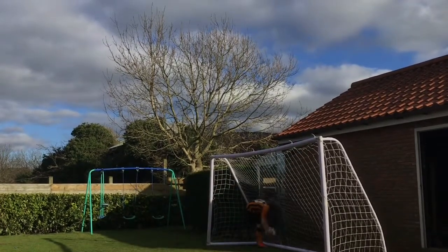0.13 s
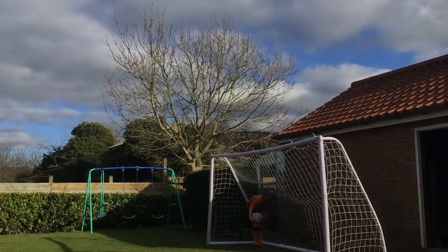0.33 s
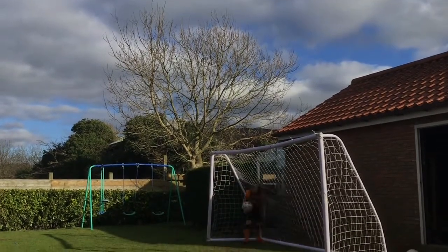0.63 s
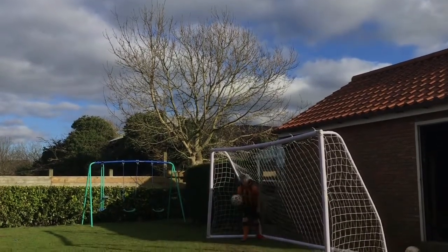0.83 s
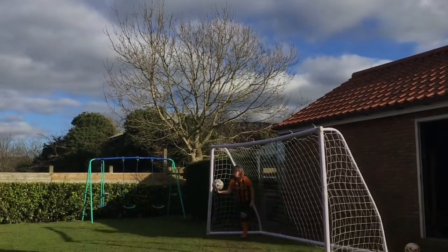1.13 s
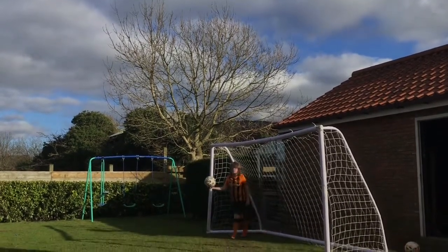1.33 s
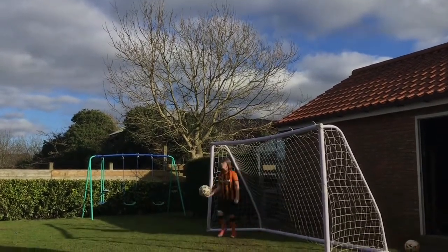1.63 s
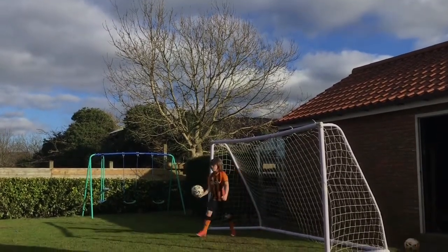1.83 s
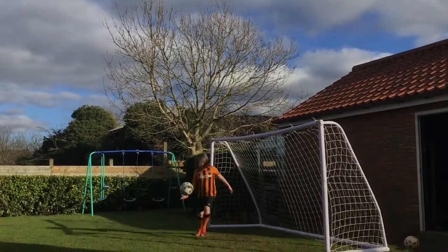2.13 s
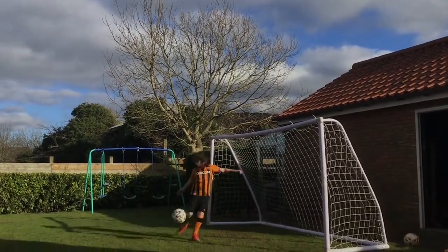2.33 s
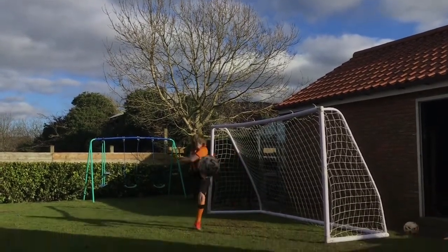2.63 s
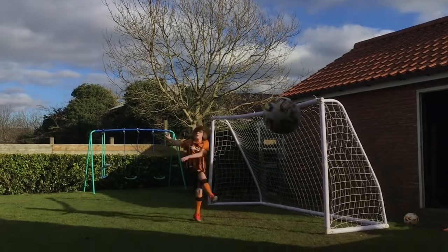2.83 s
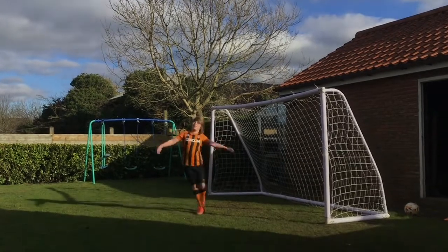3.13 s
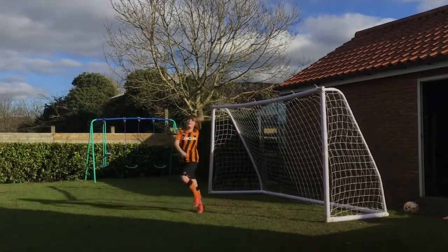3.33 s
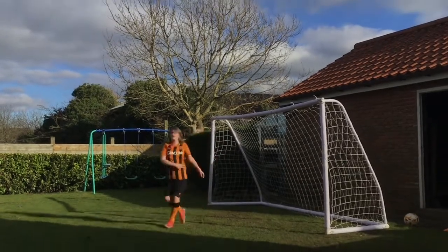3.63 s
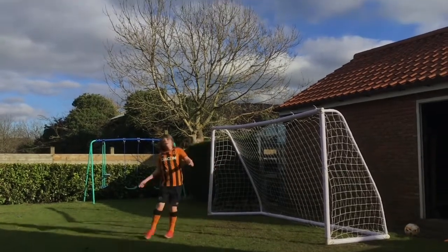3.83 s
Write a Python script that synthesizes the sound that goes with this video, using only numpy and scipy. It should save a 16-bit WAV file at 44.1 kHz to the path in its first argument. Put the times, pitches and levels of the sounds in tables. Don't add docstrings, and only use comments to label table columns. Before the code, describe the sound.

A football is punted with a dull thud, then slams loudly into a nearby panel and bounces

```python
import sys
import numpy as np
from scipy import signal
from scipy.io import wavfile

SR = 44100
rng = np.random.default_rng(int(sys.argv[2]) if len(sys.argv) > 2 else 0)


def materialize(psi):
    bounded = np.clip(np.atleast_2d(psi).T, -1, 1)
    quanta = np.round(bounded * 32767).astype(np.int16)
    wavfile.write(sys.argv[1], SR, quanta)


def volts(x):
    e = np.asarray(x, float) / 20
    return 10 ** e


N = 176400
TIME_S = np.arange(N) / SR
BAND_EDGES_HZ = 25 * 2 ** np.arange(0, 9.4, 1 / 3)
BAND_HZ = np.sqrt(BAND_EDGES_HZ[1:] * BAND_EDGES_HZ[:-1])

# start_s, pitch_hz, level_db, hold_s, t60_s
PUNT_MODES = [
    (2.4035, 125.5, -17.5, 0.017, 0.098),
    (2.4, 177, -22.5, 0.008, 0.093),
    (2.402, 67, -34, 0.025, 0.18),
    (2.399, 302, -34, 0.0059, 0.038),
]
# start_s, pitch_hz, level_db, hold_s, t60_s
THUDS = [(3.1398, 135, -5, 0.017, 0.02), (3.1416, 258, -10, 0.013, 0.02), (3.146, 108, -14, 0.03, 0.05),
         (3.1425, 175, -16, .012, .04), (3.142, 346, -20, .008, 0.03), (3.15, 56, -24, 0.024, 0.11),
         (3.2, 139, -24, 0.0052, 0.16), (3.283, 355, -36, 0.013, 0.04), (3.29, 95, -35, 0.048, 0.12),
         (3.357, 190, -16.5, 0.0117, 0.049), (3.358, 297, -18, 0.0085, 0.016),
         (3.3705, 85, -10, 0.0073, .03), (3.3635, 125, -15, 0.008, .03), (3.3885, 79, -13, 0.024, 0.12),
         (3.446, 138, -27.5, 0.021, 0.095), (3.449, 83.8, -28.5, 0.024, 0.21),
         (3.886, 115.2, -33, 0.067, 0.59), (3.888, 188, -38, 0.015, 0.13)]
# start_s, level_db, hold_s, t60_s,
# tilt_db_per_octave
SLAPS = [(2.4, -37, 0.0082, 0.11, 0.45), (2.413, -52, 0.0032, 0.058, 5.5), (2.422, -55, .004, .08, 3),
         (2.447, -63, .005, 0.097, 4.5), (2.497, -72.5, 0.0073, 0.54, -4),
         (3.128, -50.5, 0.0074, 0.036, 2.5), (3.1394, -27, 0.017, 0.069, 1.35),
         (3.162, -48.5, 0.013, 0.074, -5), (3.197, -49.5, 0.038, 0.069, 0), (3.283, -61, 0.016, 0.11, 3),
         (3.3533, -34.5, 0.0065, 0.032, -1), (3.363, -38, 0.012, 0.093, 4.5),
         (3.443, -49, 0.0054, 0.078, 1), (3.446, -49.5, 0.0063, 0.073, 4), (3.454, -49.5, 0.01, 0.076, 4.5),
         (3.8857, -46.5, 0.016, 0.1, 4), (3.91, -38, 0.0051, 0.074, 4.5), (3.935, -43, 0.012, 0.13, 1.5),
         (3.996, -58, .01, .1, 5)]
# freq_hz, density_db_per_hz
SLAP_SPECTRUM = [(180, -2), (300, -4.5), (978, -21), (1210, -17), (1870, -22.5), (2700, -24.5),
                 (7570, -36.5), (9000, -38.5), (14700, -43.5), (16000, -42)]
# start_s, peak_db, lowest_hz
CRACKS = [(2.3988, -10.5, 1500), (2.4148, -25, 7000), (2.4222, -17, 5000), (2.448, -36, 5000),
          (3.098, -50, 2500), (3.1404, -5.5, 3000), (3.1468, -5, 1500), (3.149, -9, 4000),
          (3.1535, -5, 1500), (3.161, -18, 2000), (3.33, -40, 5000), (3.354, -22, 3000),
          (3.3605, -21, 3000), (3.366, -13, 2500), (3.451, -32, 3500), (3.456, -29, 5000),
          (3.8854, -30, 1200), (3.9068, -8, 7500), (3.9125, -15, 8000), (3.9352, -16, 7500),
          (3.941, -22, 8000), (3.9955, -25, 7000)]
# start_s, level_db, hold_s, t60_s, centre_hz
RINGS = [(2.3985, -35.5, 0.004, 0.034, 820), (3.142, -33, .014, .09, 5400), (3.17, -50, .05, .12, 4800),
         (3.49, -62, .045, .1, 4000), (3.385, -52, .03, .1, 2600), (2.446, -54, .01, .08, 1150),
         (2.495, -59, .005, 0.34, 1295), (3.144, -26, 0.012, 0.033, 2576),
         (3.1405, -26, 0.0062, 0.055, 786), (3.157, -41, 0.0085, .1, 1225),
         (3.208, -55.5, 0.03, 0.14, 2590), (3.356, -46.5, 0.0059, 0.25, 1280),
         (3.445, -50.5, 0.0077, 0.1, 1263), (3.446, -51, 0.0065, 0.056, 4500)]
# start_s, peak_db
BLOWS = [
    (3.141, -30),
    (3.147, -27),
    (3.1535, -28),
    (3.163, -34),
    (3.358, -42),
    (3.366, -40),
    (3.449, -48),
]
# pitch_hz, level_db, t60_s
PANEL_MODES = [(456, -3, .07), (620.5, -10, .05), (727, -5, .05), (1233, -3, .07), (2060, -12, .04),
               (2280, -10, .04), (2460, -10, .04), (2690, -8, .03), (3190, -10, .03), (5690, -20, .03),
               (6190, -20, .03)]
# start_s, peak_db
TAPS = [
    (3.885, -51.5),
    (3.907, -33),
    (3.917, -40),
    (3.935, -35.5),
    (3.946, -48),
]
# pitch_hz, level_db, t60_s
FRAME_MODES = [(1770, -4, .03), (3110, -2, 0.015), (4330, -5, 0.016), (2000, -16.5, 0.13)]
# start_s, level_db, hold_s, t60_s, tilt_db_per_octave
STEPS = [(0.0, -75, 0.042, 0.42, 8.5), (0.659, -72.5, 0.039, 0.21, 0.5), (0.79, -57.5, 0.052, 0.19, 2.5),
         (0.863, -71.5, .06, 0.75, 1), (1.201, -65, .06, 0.22, 5), (1.305, -76, 0.069, 0.39, 2),
         (1.393, -71.5, 0.034, 0.22, 2), (1.6, -80, .1, 0.08, -5.5), (1.71, -67.5, 0.051, 0.21, 0.5),
         (2.265, -69.5, 0.04, 0.088, 3.1), (2.96, -60, 0.02, 0.34, 2), (3.069, -66, 0.063, 0.6, -0.5)]
# freq_hz, density_db_per_hz
STEP_SPECTRUM = [(280, -4.5), (600, -4.5), (1340, -12.5), (2400, -20), (7000, -30.5), (8500, -25.5),
                 (16000, -29)]
# start_s, level_db, hold_s, t60_s, centre_hz
THUMPS = [(0.018, -63.5, 0.047, 0.22, 388.9), (0.78, -65, 0.078, 0.19, 580),
          (1.206, -63.5, 0.012, 0.083, 780), (1.221, -55.5, 0.014, 0.21, 550),
          (1.685, -67.5, 0.044, 0.1, 550), (2.4, -43, 0.0057, 0.17, 426), (2.968, -68, 0.02, 0.15, 4000),
          (3.0, -72, .07, .2, 1900), (.675, -76, .01, .06, 1600), (.719, -74, .01, .05, 1300),
          (1.402, -74, .008, .06, 2500), (1.21, -57, .05, 0.36, 370), (0.786, -66, 0.0091, 0.092, 1100),
          (3.92, -47, 0.046, .15, 600), (2.42, -44.5, 0.018, 0.36, 200), (3.742, -69, .07, 0.2, 1350),
          (3.8, -70, 0.062, .2, 750), (3.357, -33, 0.011, 0.14, 457), (3.895, -46, 0.09, 0.15, 240),
          (3.142, -25, 0.013, 0.15, 325), (3.57, -50, 0.17, 0.43, 107.6)]
# start_s, length_s, first_hz, last_hz, level_db
BIRDS = [
    (2.27, .1, 8150, 7300, -85),
    (2.5, .062, 7800, 7100, -84),
    (2.66, .07, 7450, 6500, -88),
    (2.76, .07, 4300, 4250, -91),
    (1.065, .115, 3400, 3220, -84),
    (1.07, .14, 1650, 1760, -85),
    (.47, .11, 3550, 3400, -90),
    (.89, .08, 3350, 3350, -89),
    (1.84, .14, 3550, 3450, -90),
    (3.04, .035, 4250, 4250, -82),
]
# freq_hz, level_db
RUMBLE_SPECTRUM = [(15, -61.5), (25, -24.5), (59, -16.5), (85, -7.5), (113, -0.5), (186, -15), (214, -17),
                   (349, -21.5), (700, -44), (910, -41.5), (1540, -120)]
# freq_hz, level_db
HISS_SPECTRUM = [(400, -10.5), (600, 2), (1300, -2.5), (3700, -4), (7000, -11.5), (9000, -9), (14000, -14),
                 (16500, -11.5)]


def rms_one(x):
    return x / np.sqrt(np.mean(x ** 2) + 1e-20)


def drift(rate_hz):
    pole = np.exp(-80 * np.pi * rate_hz / SR)
    white = rng.standard_normal(N // 40 + 2002)
    slow = signal.lfilter([1], [1, -2 * pole, pole * pole], white)[2000:]
    return np.interp(np.arange(N) / 40, np.arange(len(slow)), rms_one(slow))


def shape(t, rise_s, hold_s, t60_s):
    return (1 - np.exp(-t / rise_s)) * volts(-60 * np.maximum(t - hold_s, 0) / t60_s)


def thuds(rows, wobble_db, wobble_rad):
    out = np.zeros(N)
    for start_s, pitch_hz, level_db, hold_s, t60_s in rows:
        t = np.maximum(TIME_S - start_s, 0)
        late = np.clip(t / 0.059, 0, 1)
        level = volts(level_db + wobble_db * late * drift(4))
        phase = 2 * np.pi * pitch_hz * t + wobble_rad * late * drift(30)
        out += level * shape(t, 0.0011, hold_s, t60_s) * np.sin(phase)
    return out


def punt():
    first_echo_s, flutter_s, uneven_s = 0.051, 0.044, 0.003
    first_db, loss_db, uneven_db = -10, 3.5, 2.5
    main = thuds(PUNT_MODES[:1], 0, 0)
    out = thuds(PUNT_MODES, 0, 0)
    for k, (later, louder) in enumerate(rng.uniform(-1, 1, (7, 2))):
        delay_s = first_echo_s + k * flutter_s + uneven_s * later
        echo_db = first_db - k * loss_db + uneven_db * louder
        out += volts(echo_db) * np.interp(TIME_S - delay_s, TIME_S, main)
    return out


def bursts(noise, rows, spectrum, rise_s, tail_db, tail_t60_s):
    out = np.zeros(N)
    octave = np.log2(BAND_HZ / 2000)[:, None]
    shrink = 2 ** (-0.13 * octave)
    colour = volts(at_hz(spectrum, BAND_HZ))[:, None]
    scale = np.std(np.sum(colour * noise, axis=0))
    for start_s, level_db, hold_s, t60_s, tilt_db in rows:
        i = int(start_s * SR)
        t = TIME_S[:min(N - i, SR // 2)]
        direct = shape(t, rise_s, hold_s, t60_s * shrink)
        tail = volts(tail_db - 0.96 * octave) * shape(t, 0.0033, hold_s, tail_t60_s * shrink)
        tilted = colour * volts(tilt_db * octave) * noise[:, i:i + len(t)]
        out[i:i + len(t)] += volts(level_db) / scale * np.sum(tilted * (direct + tail), axis=0)
    return out


def cracks():
    out, white = np.zeros(N), rng.standard_normal(N)
    for start_s, peak_db, lowest_hz in CRACKS:
        i = int(start_s * SR)
        t = TIME_S[:min(N - i, SR // 20)]
        snap = volts(peak_db - 10) * shape(t, 0.00033, 0, 0.0049) * white[i:i + len(t)]
        highpass = signal.butter(2, lowest_hz, "high", fs=SR, output="sos")
        out[i:i + len(t)] += signal.sosfilt(highpass, snap)
    return signal.lfilter([0.6], [1, -0.4], out)


def knocks(rows, width_octaves, rise_s):
    out = np.zeros(N)
    grain = rng.standard_normal(N) * volts(2 * drift(200))
    for start_s, level_db, hold_s, t60_s, centre_hz in rows:
        i = int(start_s * SR)
        t = TIME_S[:min(N - i, SR // 2)]
        band_hz = centre_hz * 2 ** (np.array([-0.5, 0.5]) * width_octaves)
        sos = signal.butter(1, band_hz, "band", fs=SR, output="sos")
        tone = rms_one(signal.sosfilt(np.vstack([sos, sos]), grain))[i:i + len(t)]
        out[i:i + len(t)] += volts(level_db) * shape(t, rise_s, hold_s, t60_s) * tone
    return out


def struck(taps, modes):
    out = np.zeros(N)
    uneven_db = rng.normal(0, 2.5, (len(taps), len(modes)))
    for (start_s, peak_db), chances_db in zip(taps, uneven_db):
        i = int(start_s * SR)
        t = TIME_S[:min(N - i, SR // 4)]
        for (pitch_hz, level_db, t60_s), chance_db in zip(modes, chances_db):
            decay = volts(peak_db + level_db + chance_db - 60 * t / t60_s)
            out[i:i + len(t)] += decay * np.sin(2 * np.pi * pitch_hz * t)
    return out


def footsteps(rustle):
    brush = bursts(rustle, STEPS, STEP_SPECTRUM, rise_s=0.017, tail_db=-19, tail_t60_s=0.36)
    return brush + knocks(THUMPS, width_octaves=0.75, rise_s=0.0022)


def birds():
    out = np.zeros(N)
    for start_s, length_s, first_hz, last_hz, level_db in BIRDS:
        u = np.clip((TIME_S - start_s) / length_s, 0, 1)
        glide = 0.6 * u + 0.4 * u ** 4
        pitch_hz = first_hz + (last_hz - first_hz) * glide + 40 * drift(15)
        swell = np.sin(np.pi * u) ** 0.3 * (u < 1)
        out += volts(level_db + 3) * swell * np.sin(2 * np.pi * np.cumsum(pitch_hz) / SR)
    return out


def at_hz(points, hz):
    freq_hz, level_db = np.transpose(points)
    return np.interp(np.log(hz), np.log(freq_hz), level_db, left=-70, right=-70)


def bands():
    white = rng.standard_normal((2, N + SR // 2))
    out = []
    for k, edges_hz in enumerate(zip(BAND_EDGES_HZ, BAND_EDGES_HZ[1:])):
        sos = signal.butter(2, edges_hz, "band", fs=SR, output="sos")
        out.append(signal.sosfilt(sos, white[k % 2])[SR // 2:])
    return np.array(out)


def steady(noise, spectrum, level_db, patchy_db):
    gains = [volts(at_hz(spectrum, hz) + patchy_db * drift(9)) for hz in BAND_HZ]
    return volts(level_db) * rms_one(np.sum(noise * gains, axis=0))


def scene():
    air = bands()
    rustle = bands() * volts(1.4 * drift(150))
    ball = punt() + thuds(THUDS, wobble_db=3.5, wobble_rad=0.52) + cracks()
    ball += knocks(RINGS, width_octaves=0.4, rise_s=0.0014)
    ball += bursts(rustle, SLAPS, SLAP_SPECTRUM, rise_s=0.0006, tail_db=-16, tail_t60_s=0.54)
    bodies = struck(BLOWS, PANEL_MODES) + struck(TAPS, FRAME_MODES)
    steps = footsteps(rustle[:, ::-1])
    rumble = steady(air, RUMBLE_SPECTRUM, level_db=-56, patchy_db=0.5)
    hiss = steady(air[:, ::-1], HISS_SPECTRUM, level_db=-78.5, patchy_db=1.86)
    return (ball + bodies + steps + birds() + rumble + hiss)[None]


def top_cut(x):
    return signal.sosfilt(signal.butter(12, 16980, fs=SR, output="sos"), x)


def record(dry):
    rounded = 1.48 * np.tanh(dry / 1.548)
    highpass = signal.butter(3, 45, "high", fs=SR, output="sos")
    lowpass = signal.cheby2(10, 50, 16800, fs=SR, output="sos")
    mix = signal.sosfilt(lowpass, signal.sosfilt(highpass, rounded))
    return top_cut(mix)


dry = scene()
out = record(dry)
materialize(out)
```